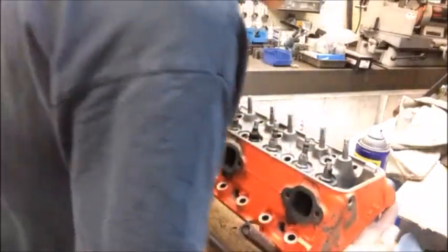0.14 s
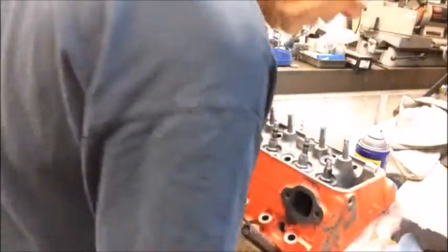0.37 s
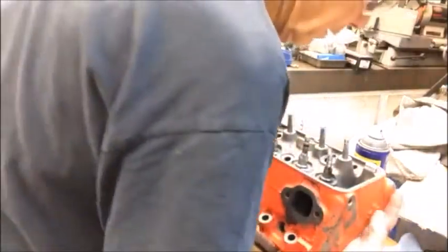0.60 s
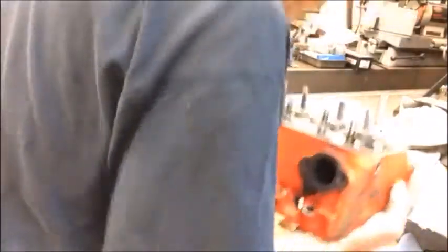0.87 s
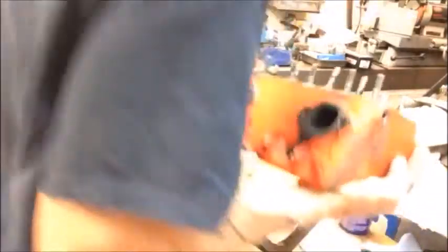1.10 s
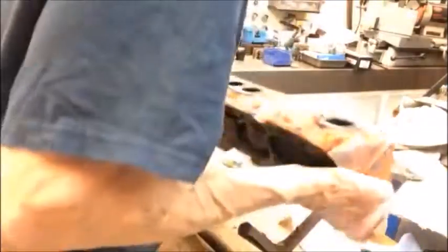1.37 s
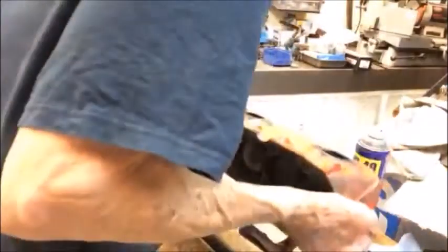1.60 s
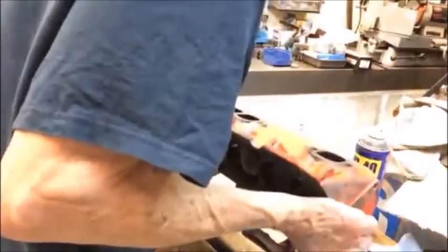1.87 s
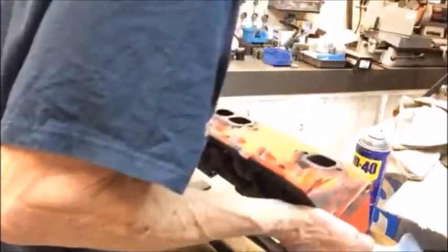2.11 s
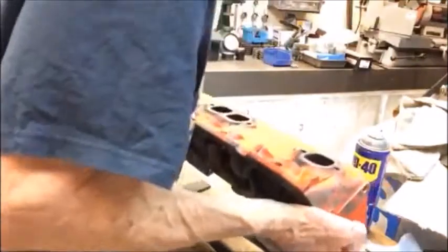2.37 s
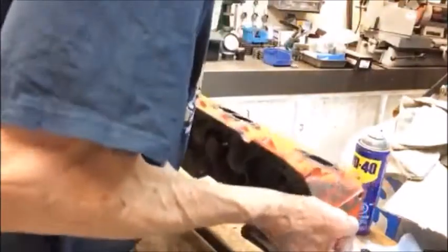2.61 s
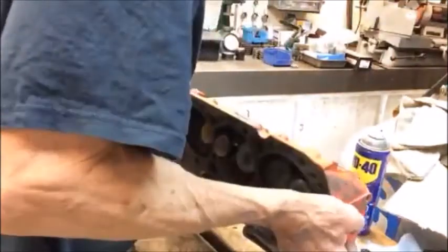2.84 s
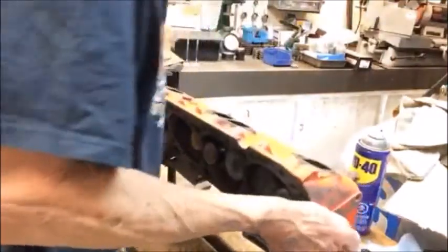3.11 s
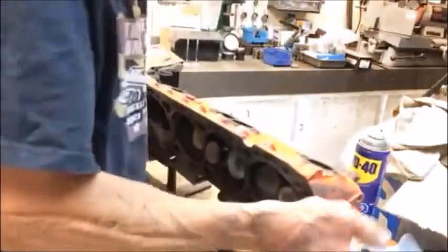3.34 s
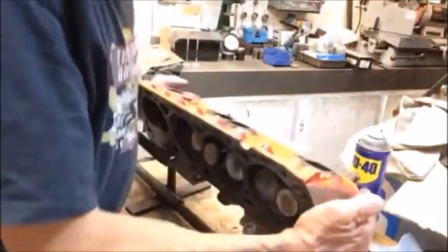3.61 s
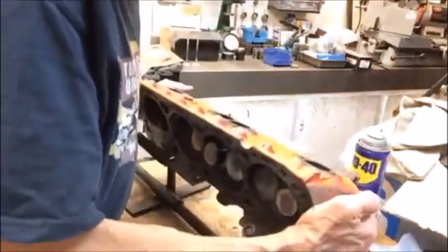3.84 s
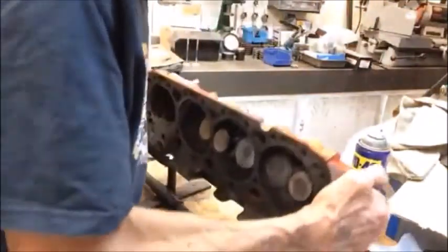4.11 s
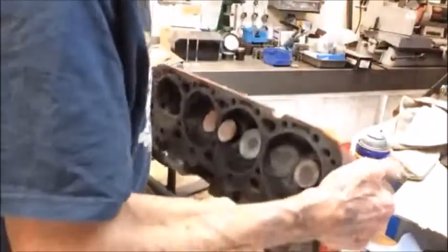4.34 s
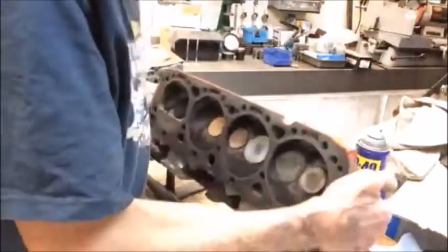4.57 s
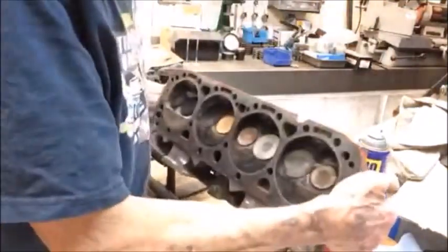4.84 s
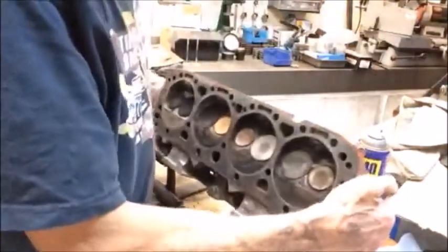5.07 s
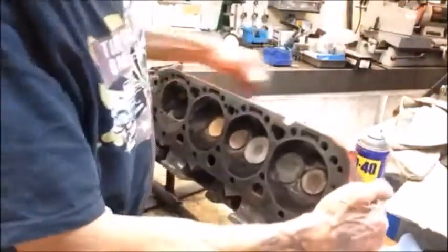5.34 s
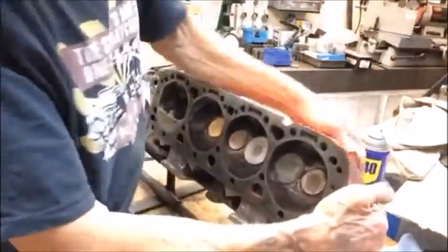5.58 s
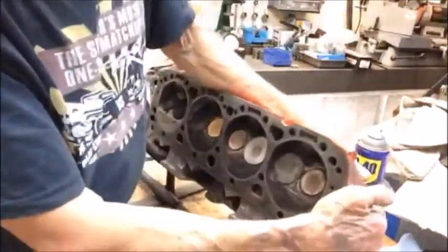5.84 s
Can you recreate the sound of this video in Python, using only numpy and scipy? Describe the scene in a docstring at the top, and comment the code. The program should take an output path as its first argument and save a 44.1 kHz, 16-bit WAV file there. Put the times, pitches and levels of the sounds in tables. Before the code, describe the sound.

A steady low motor and mains hum with soft room air runs throughout a small, hard workshop, heard close. A brief hand swish on rough iron opens it. Around 0.85-1.05 s come dull, soft knocks with slight grinding. A light clack at 1.46 s leads to the loudest clank at 1.65 s, followed by weighty thuds and clacks to 1.86 s, a short rolling rattle, and a thin high steel ring with a metallic arm ringing. Quick small taps patter at 1.92-2.12 s, then the ring is muted. At 2.75-2.95 s heavy clunks and grinding scrape end in another hard clack. Light touches and hand rustle follow at 3.3-3.65 s, faint knocks at 3.76-4.2 s. From 4.42 to 4.73 s a dense cluster of thuds, scrape and bright clacks seats the casting. Only faint taps and a soft hand slide near 5.6 s remain over the hum.

```python
"""Engine head on a workbench

A heavy cast-iron engine head is turned over on a steel stand on a wooden workbench.
Noisy contact forces set bench and casting modes ringing as thuds, knocks, clacks and ticks.
A loose rod, the stand's arm and small parts ring on as decaying sines; sliding hands, grinding and
rolling are shaped noise; motor and mains tones hum over the workshop's air."""
import sys
import numpy as np
from scipy import signal
from scipy.fft import rfft, irfft
from scipy.io import wavfile

SR = 44100
rng = np.random.default_rng(int(sys.argv[2]) if len(sys.argv) > 2 else 0)


def file_out(sig):
    """Save sig as 16-bit WAV at sys.argv[1]."""
    # one column per channel
    cols = np.atleast_2d(sig).T
    # limit, then scale
    lim = np.clip(cols, -1, 1)
    pcm = np.round(lim * 32767).astype(np.int16)
    wavfile.write(sys.argv[1], SR, pcm)


def field_ratio(decibels):
    """Amplitude ratio for a level in dB (20 dB per decade); scalars and array-likes work."""
    return 10 ** (np.asarray(decibels, dtype=float) / 20)


N = 262648

# Casting grinding on its supports. Each row: peak in seconds, level in dB, rise and fall in seconds per 20 dB.
GRIND_STROKES = [(0.976, -39, 0.19, 0.17), (1.89, -44, 0.19, 0.39), (2.785, -27.5, 0.051, 0.12),
                 (2.99, -33.5, 0.14, 0.17), (3.4, -57, 0.44, 0.54), (4.1, -60.5, 0.64, 0.59),
                 (4.61, -28.5, 0.15, 0.18), (5.3, -57, .9, 0.92)]
# Loose part tapping the casting as it settles. Each row: start in seconds, clack level in dB.
SETTLING_TAPS = [(1.9204, -25.5), (1.9624, -19), (1.9904, -46), (2.0133, -19), (2.0388, -21),
                 (2.0594, -29.5), (2.0744, -30.5), (2.1181, -35.5)]


def rms_one(x):
    """Scale to rms 1."""
    return x / np.sqrt(np.mean(x ** 2) + 1e-20)


def ring(x, hz, t60_s):
    """Two-pole resonator: a unit click starts a decaying sine of height 1."""
    r = field_ratio(-60 / (t60_s * SR))
    w = 2 * np.pi * hz / SR
    return signal.lfilter([0, np.sin(w)], [1, -2 * r * np.cos(w), r * r], x + 1e-18)


def band(x, low_hz, high_hz):
    """Butterworth band-pass."""
    sos = signal.butter(3, [low_hz, high_hz], "band", fs=SR, output="sos")
    return signal.sosfilt(sos, x + 1e-18)


def coloured(spectrum):
    """Gaussian noise shaped to a spectrum of (Hz, relative dB per Hz); rms 1."""
    hz, level_db = np.transpose(spectrum)
    log_hz = np.log(np.arange(N // 2 + 1) * SR / N + 1)
    gain = field_ratio(np.interp(log_hz, np.log(hz), level_db))
    return rms_one(irfft(rfft(rng.standard_normal(N)) * gain, N))


def drift(rate_hz):
    """Slow random wander: noise through a double low-pass pole; rms 1."""
    r = np.exp(-2 * np.pi * rate_hz / SR)
    wander = signal.lfilter([1], [1, -2 * r, r * r], rng.standard_normal(N + SR))
    return rms_one(wander[SR:])


def strokes(rows):
    """Gain of strokes that rise and fall evenly in dB about their peaks."""
    t = np.arange(N) / SR
    return sum(field_ratio(db - 20 * np.maximum((peak_s - t) / rise_s, (t - peak_s) / fall_s))
               for peak_s, db, rise_s, fall_s in rows)


def hum():
    """Steady motor and mains tones, the lowest six wavering a little, over the air of the room."""
    # Each row: frequency in Hz, level in dB rms.
    hum_tones = [(59.2, -57), (118.4, -58.5), (145.3, -66.5), (177.6, -64.5), (317.6, -77.5),
                 (360.7, -71.5), (479.1, -82.5), (602.9, -77), (780.6, -78.5), (839.8, -78.5), (958.2, -75),
                 (1200, -77.5), (1319, -76), (1443, -80.5), (1561, -78), (1680, -77.5), (1798, -77),
                 (1922, -79.5), (2040, -78.5), (2159, -75.5), (2283, -78.5)]
    # Each row: frequency in Hz, relative level in dB per Hz.
    air_spectrum = [(25, -13), (60, -2), (130, -4.5), (260, -18.5), (500, -19), (1000, -27.5),
                    (2300, -33.5), (2700, -33), (7700, -38), (16000, -44.5)]
    air_db = -58
    t = np.arange(N) / SR
    out = field_ratio(air_db) * coloured(air_spectrum)
    for k, (hz, db) in enumerate(hum_tones):
        waver_db = 0.66 * drift(1.2) if k < 6 else 0
        out += field_ratio(db + waver_db) * np.sqrt(2) * np.sin(2 * np.pi * (hz * t + rng.random()))
    return out


def workshop(x):
    """Diffuse tail: dying noise whose treble dies twice as fast."""
    t60_s, dull_hz = 0.3, 4000
    t = np.arange(SR) / SR
    fade = field_ratio(-60 * t / t60_s) * np.clip((t - .004) / 0.011, 0, 1)
    white = rng.standard_normal(SR)
    dull = signal.sosfilt(signal.butter(1, dull_hz, fs=SR, output="sos"), white)
    # the room's tail is kept above about 200 Hz
    tail = band(fade * (dull + fade * (white - dull)), 199, 22000)
    return signal.fftconvolve(x, tail / np.sqrt(np.sum(tail ** 2)))[:N]


def slides():
    """Hands sliding on rough iron: hiss with a slight grain."""
    # Each row: peak in seconds, level in dB, rise and fall in seconds per 20 dB.
    slide_strokes = [(0.022, -38, 0.015, .12), (3.33, -52, 0.12, 0.15), (3.482, -47, 0.01, .15),
                     (3.526, -38.5, 0.047, 0.039), (3.65, -51.5, .12, 0.13), (5.522, -53.5, 0.025, 0.15),
                     (5.598, -47.5, 0.11, 0.086)]
    # Each row: frequency in Hz, relative level in dB per Hz.
    skin_spectrum = [(180, -21), (300, -3), (713, 2), (801, 0.5), (1060, 3.5), (2140, -1), (2320, -2),
                     (4440, -0.5), (15000, -16.5), (16000, -30)]
    grain = field_ratio(1.66 * drift(69))
    return strokes(slide_strokes) * grain * coloured(skin_spectrum)


def rolling():
    """The rod rolls to rest over the rough bench: dense tiny contacts."""
    # Each row: peak in seconds, level in dB, rise and fall in seconds per 20 dB.
    roll_strokes = [(1.66, -25.5, .008, 0.1), (1.9, -50.5, .17, 1), (2.2, -56, .3, 0.25)]
    grains_per_s = 9000
    hits = rng.random(N) < grains_per_s / SR
    height = field_ratio(3.2 * np.minimum(rng.exponential(1, N), 3))
    grains = hits * height * rng.choice([-1, 1], N)
    rumble = band(grains, 530, 2800) + field_ratio(-10.5) * band(grains, 2400, 6700)
    return strokes(roll_strokes) * rms_one(rumble)


def chime(s, level_db, hz, t60_s, rise_s=0.014):
    """A mode that swells in over a few ms and wavers as the loose part rocks."""
    clicks = np.zeros(N)
    np.add.at(clicks, np.round(np.asarray(s) * SR).astype(int), field_ratio(level_db))
    soft = ring(clicks, hz, rise_s) * 2 * np.log(1000) / (rise_s * SR)
    return ring(soft, hz, t60_s) * field_ratio(1.5 * drift(25))


def loose_rod():
    """Bending modes split by the rod's shape; where and from which side it is struck sets their shares."""
    # Each row: frequency in Hz, level in dB, t60 in seconds, dB gained per dB of a hit's lean.
    rod_modes = [(2571, -3, 0.63, -1), (2602, 0, 0.64, 0.95), (6285, -7, 1, -2.4), (6312, -7.5, 0.72, 0.23),
                 (6294, -4, 1, 1), (10900, -12, 0.94, 1), (10940, -18, .7, -2.1)]
    # Each row: start in seconds, levels of first, second and third mode in dB, lean to one plane in dB.
    rod_hits = [(1.462, -41.5, -39, -44.5, 5), (1.668, -24, -37.5, -33.5, -0.5),
                (1.808, -29.5, -38.5, -48.5, 3.5), (1.885, -31.5, -46.5, -51, 2.5),
                (1.964, -44.5, -37.5, -37, -4), (2.090, -44.5, -58, -66.5, 5.5),
                (2.881, -56, -73, -63, -2.5), (2.974, -63, -62.5, -70, -5.5)]
    rests_s, freed_s, mute_db_per_s = 2.214, 2.87, 66
    hits = np.array(rod_hits)
    out = np.zeros(N)
    for hz, db, t60_s, side in rod_modes:
        mode = np.searchsorted([4000, 8000], hz)
        out += chime(hits[:, 0], hits[:, 1 + mode] + db + side * hits[:, 4], hz, t60_s)
    t = np.arange(N) / SR
    # lying on the bench mutes the rod; the mute ends at once when it is freed
    return out * field_ratio(-mute_db_per_s * np.maximum(t - rests_s, 0) * (t < freed_s))


def stand_arm():
    """The struck arm of the stand rings in many modes, each blow with its own spectral tilt."""
    # Each row: frequency in Hz, level in dB, t60 in seconds.
    arm_modes = [(1050, -16, 1), (1050, -3, 0.7), (2216, -9.5, 0.8), (2428, -30, 0.8), (3047, -7, 0.23),
                 (3480, -7.5, 0.2), (3650, 13, 0.075), (3980, -7.5, 0.26), (4300, -5.5, 0.11),
                 (4613, -13, 0.17), (5100, -6.5, 0.23), (5250, -26, 0.077)]
    # Each row: start in seconds, level in dB, tilt in dB per octave about 2500 Hz.
    arm_hits = [(1.842, -39, 6), (1.861, -26.5, -0.3)]
    s, hit_db, tilt_db = np.transpose(arm_hits)
    return sum(chime(s, hit_db + tilt_db * np.log2(hz / 2500) + db, hz, t60_s)
               for hz, db, t60_s in arm_modes)


def small_parts():
    """A tapping part, a small bright part, and hollows and studs that each ring briefly on one note."""
    # Each row: frequency in Hz, level in dB, t60 in seconds.
    bright_modes = [(5050, -2, 0.04), (9660, 5, 0.02), (9880, -19.5, 0.23), (13450, -5.5, 0.07)]
    # Each row: start in seconds, level in dB.
    bright_hits = [(4.655, -25), (4.673, -30), (4.719, -40)]
    # Each row: start in seconds, frequency in Hz, level in dB, t60 in seconds.
    ping_notes = [(.877, 827, -38, 0.077), (.960, 870, -41, 0.053), (1.001, 1220, -44, 0.029),
                  (1.656, 5190, -36, 0.49), (2.771, 2030, -33, 0.27), (2.812, 623, -30, 0.099),
                  (2.869, 6820, -36.5, 0.13), (2.87, 2850, -36, 0.11), (3.762, 4590, -47, 0.2),
                  (2.928, 3260, -43, 0.29), (2.93, 2035, -40.5, 0.29), (3.981, 820, -30, 0.04),
                  (3.982, 983, -39, 0.13), (4.147, 880, -42, 0.057), (4.148, 790, -25.5, 0.068),
                  (4.603, 2080, -36, 0.34), (4.733, 1050, -28, 0.023), (5.390, 1294, -39.5, 0.019),
                  (5.73, 1050, -46.5, 0.081)]
    tap_s, tap_db = np.transpose(SETTLING_TAPS)
    out = chime(tap_s, tap_db, 1256, 0.013, rise_s=0.0065)
    hit_s, hit_db = np.transpose(bright_hits)
    out += sum(chime(hit_s, hit_db + db, hz, t60_s, rise_s=0.0045) for hz, db, t60_s in bright_modes)
    return out + sum(chime([s], db, hz, t60_s, rise_s=.004) for s, hz, db, t60_s in ping_notes)


def touches():
    """All contacts as columns; the taps share one balance of thud, clack and tick."""
    # Casting meeting the stand. Each row: start in seconds, weight into the bench in dB,
    # metal-on-metal clack in dB, edge tick in dB, thud pitch in Hz.
    stand_contacts = [(0.8529, -34.5, -49, -73, 213), (0.8757, -34.5, -48, -67, 240),
                      (0.9281, -40, -74, -74, 216), (0.958, -64, -45, -77, 119),
                      (1.0018, -39.5, -40, -76, 84), (1.0405, -35.5, -74, -70, 140),
                      (1.4619, -64, -34.5, -31, 133), (1.6522, -27.5, 3.5, -30, 340),
                      (1.7167, -17, -28, -39.5, 172), (1.7301, -35.5, -17, -50, 166),
                      (1.7432, -15.5, -16, -32.5, 227), (1.7622, -21, -7, -38.5, 254),
                      (1.841, -31.5, -27, -26.5, 303), (1.8606, -34.5, -31, -19.5, 77),
                      (2.7482, -18.5, -20, -56.5, 183), (2.7666, -18.5, -20.5, -47, 155),
                      (2.8084, -29.5, -31, -62, 302), (2.868, -54, -32, -45.5, 57),
                      (2.8726, -63, -29, -38.5, 137), (2.9123, -25.5, -24.5, -42, 295),
                      (2.9245, -17.5, -1.5, -40, 200), (2.9443, -17, -31, -64, 155),
                      (3.2984, -43, -37.5, -75, 139), (3.3276, -52, -54, -50, 123),
                      (3.7601, -55, -34.5, -48.5, 173), (3.9815, -34, -38, -59.5, 223),
                      (4.0208, -58, -41.5, -60.5, 124), (4.14, -39.5, -46, -60, 250),
                      (4.146, -33.5, -33.5, -60, 240), (4.202, -33, -63.5, -69, 204),
                      (4.418, -26.5, -36, -50, 202), (4.472, -21.5, -21.5, -39.5, 173),
                      (4.4892, -49, -20, -37.5, 135), (4.5314, -34, -57.5, -57, 229),
                      (4.565, -28.5, -38, -44.5, 225), (4.602, -17, -21, -55, 113),
                      (4.6135, -18.5, -21.5, -38, 120), (4.6189, -27.5, -7, -27, 64),
                      (4.6557, -26, -38, -29.5, 84), (4.6703, -33, -14.5, -29.5, 62),
                      (4.7179, -37.5, -27, -32.5, 81), (4.7347, -43, -32, -56, 64.3),
                      (4.9264, -36, -53.5, -65, 87.4), (5.2545, -39.5, -62, -70, 284),
                      (5.2862, -41.5, -42, -63.5, 270), (5.39, -45, -49.5, -56, 129),
                      (5.7269, -47, -43, -70, 58.8)]
    taps = [(s, db - 18, db, db - 28, 200) for s, db in SETTLING_TAPS]
    return np.transpose(stand_contacts + taps)


def blows(level_db, rise_s, rattle_s, click, tail_db):
    """Force of every contact: a blow, a short rattle of rough surfaces and a longer, weaker shudder."""
    out = np.zeros(N + SR // 4)
    t = np.arange(SR // 4) / SR
    decay = field_ratio(-60 * t / rattle_s) + field_ratio(tail_db - 60 * t / (6.1 * rattle_s))
    fade = decay * (1 - np.exp(-t / rise_s))
    push = t * np.exp(-t / rise_s)
    blow = click * push / np.sum(push)
    for s, gain in zip(touches()[0], field_ratio(level_db)):
        rattle = rng.standard_normal(len(t)) * fade
        at = round(s * SR)
        out[at:at + len(t)] += gain * (rattle / np.sqrt(np.sum(rattle ** 2)) - blow)
    return out[:N]


def body(force, modes):
    """All modes of a body ring under one force, signs alternating."""
    return sum((-1) ** k * field_ratio(db) * ring(force, hz, t60_s) for k, (hz, db, t60_s) in enumerate(modes))


def dense_modes(force, low_hz, high_hz, t60_s, count):
    """Fins and studs of the casting: many modes scattered over a band, the higher ones dying sooner."""
    pitches_hz = np.geomspace(low_hz, high_hz, count) * (1 + .03 * rng.standard_normal(count))
    return sum(ring(force, hz, t60_s * low_hz / hz) * rng.choice([-1, 1]) for hz in pitches_hz)


def bench(thud_db, thud_hz):
    """Each thud favours the bench modes near its own pitch; grinding shakes them all."""
    # Bench top and frame. Each row: frequency in Hz, level in dB, t60 in seconds.
    bench_modes = [(60, 3, 0.13), (92, -4, 0.13), (135, -0.5, 0.16), (178, 4, 0.036), (222.6, 4.5, 0.051),
                   (272.3, -0.5, 0.093), (347.6, 5, 0.059)]
    grind = strokes(GRIND_STROKES) * field_ratio(2.7 * drift(12) - 30.5)
    out = np.zeros(N)
    for k, (hz, db, t60_s) in enumerate(bench_modes):
        favour_db = -16.0 * np.log2(hz / thud_hz) ** 2
        force = blows(thud_db + favour_db, rise_s=0.00091, rattle_s=0.05, click=1.9, tail_db=-17.0)
        force = force + grind * rng.standard_normal(N)
        out += (-1) ** k * field_ratio(db) * ring(force, hz, t60_s)
    return band(out, 49, 700)


def casting_knock(thud_db, clack_db):
    """Low casting modes under blows and grinding; the knock grows with both weight and clack."""
    # Each row: frequency in Hz, level in dB, t60 in seconds.
    low_modes = [(403, -6.5, 0.098), (528, 6, 0.022), (654, 2, 0.053), (768.3, 2.5, 0.034),
                 (926, 6.5, 0.039), (1101, 9.5, 0.009)]
    knock_db = 0.76 * thud_db + 0.41 * clack_db - 1.5
    force = blows(knock_db, rise_s=.0007, rattle_s=0.062, click=2.3, tail_db=-15.0)
    force = force + field_ratio(-41.0) * strokes(GRIND_STROKES) * rng.standard_normal(N)
    return field_ratio(-3.5) * body(band(force, 220, 1300), low_modes) + field_ratio(29) * band(force, 580, 1700)


def casting_clack(clack_db, tick_db):
    """High casting modes and fins under sharp blows; the harder the edges touch, the brighter."""
    # Each row: frequency in Hz, level in dB, t60 in seconds.
    high_modes = [(1424, -4, 0.026), (1587, -6, 0.1), (2030, -4.5, 0.015), (3706, -25.5, 0.023)]
    force = blows(clack_db, rise_s=.00006, rattle_s=0.027, click=1.9, tail_db=-6.0)
    clack = field_ratio(-18.5) * body(band(force, 1300, 4500), high_modes) + field_ratio(14.5) * band(force, 1100, 2500)
    bright_db = 0.66 * clack_db + 0.43 * tick_db
    force = blows(bright_db, rise_s=.00005, rattle_s=0.01, click=0.97, tail_db=-20.0)
    fins = dense_modes(force, 2600, 5200, t60_s=0.066, count=12)
    return clack + field_ratio(24.0) * band(force, 2400, 4300) + field_ratio(-15.0) * band(fins, 2200, 3600)


def edge_tick(tick_db):
    """Tick at the touching edge: bands of the contact force plus short dense modes."""
    force = blows(tick_db, rise_s=.00004, rattle_s=0.039, click=.1, tail_db=-13.5)
    tick = field_ratio(25.0) * band(force, 4000, 7100) + field_ratio(12) * band(force, 10500, 16000)
    fins = dense_modes(force, 5000, 10500, t60_s=0.03, count=14)
    return tick + field_ratio(-12.5) * band(fins, 5600, 18000)


def contacts():
    """Thud in the bench, knock and clack in the casting, tick at the touching edge."""
    _, thud_db, clack_db, tick_db, thud_hz = touches()
    knock = casting_knock(thud_db, clack_db)
    clack = casting_clack(clack_db, tick_db)
    return bench(thud_db, thud_hz) + knock + clack + edge_tick(tick_db)


def scene():
    """Contacts, slides and rolling feed the room's tail; ringing steel and hum are added dry."""
    room_db = -12
    near = contacts() + slides() + rolling()
    steel = loose_rod() + stand_arm() + small_parts()
    return (near + steel + field_ratio(room_db) * workshop(near) + hum())[None]


def top_cut(x):
    """Nothing passes above the cut-off."""
    return signal.sosfilt(signal.butter(12, 16620, fs=SR, output="sos"), x)


def record(dry):
    """Cuts the rumble below 45 Hz."""
    mix = signal.sosfilt(signal.butter(2, 45, "high", fs=SR, output="sos"), dry)
    return top_cut(mix)


dry = scene()
out = record(dry)
file_out(out)
```